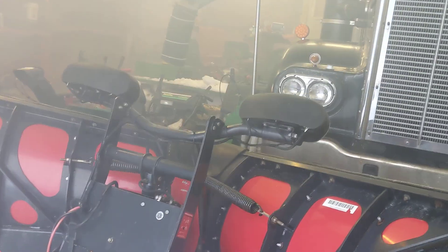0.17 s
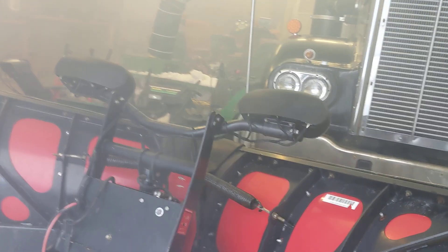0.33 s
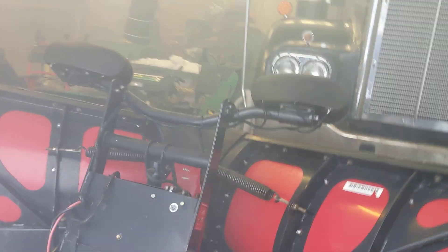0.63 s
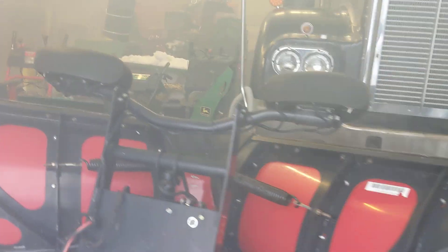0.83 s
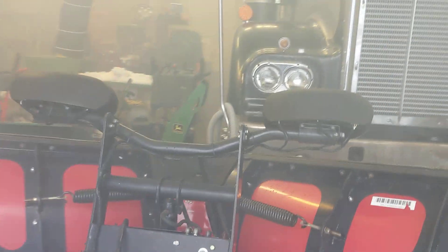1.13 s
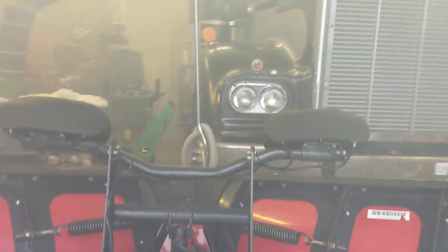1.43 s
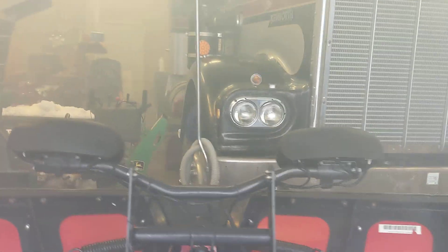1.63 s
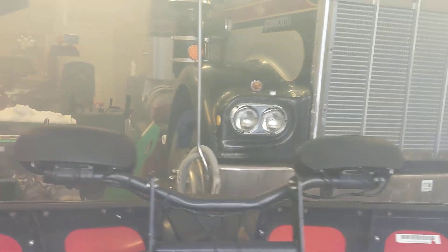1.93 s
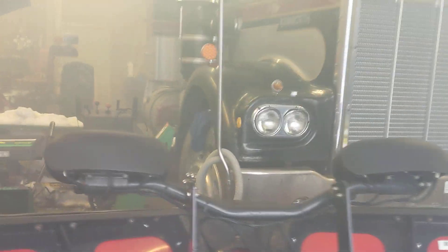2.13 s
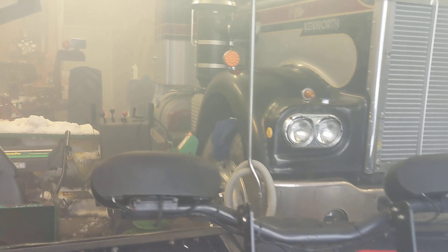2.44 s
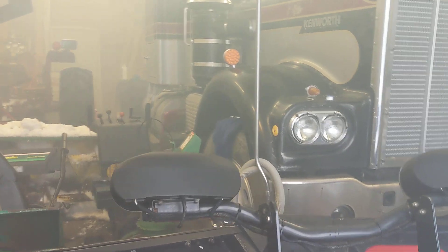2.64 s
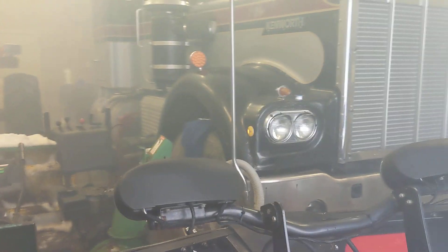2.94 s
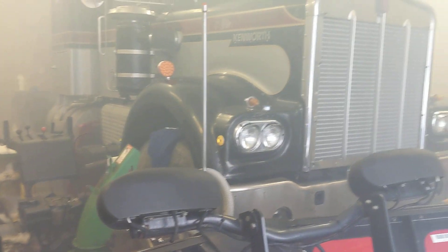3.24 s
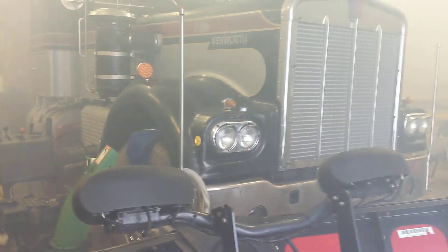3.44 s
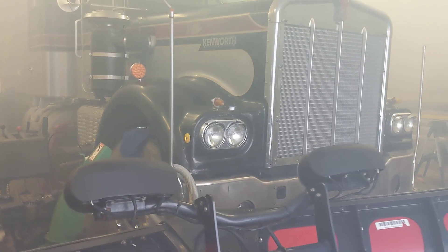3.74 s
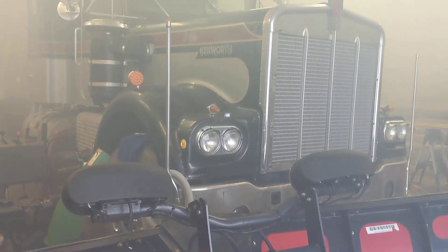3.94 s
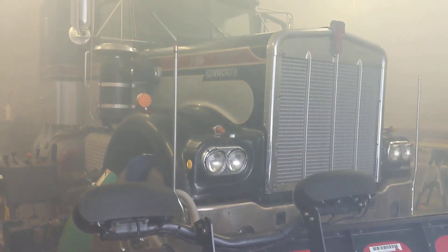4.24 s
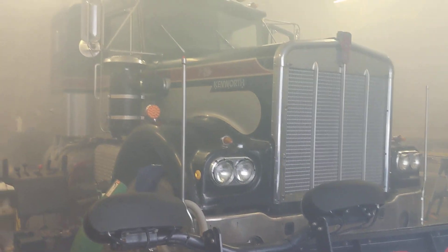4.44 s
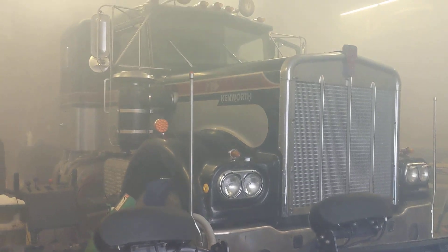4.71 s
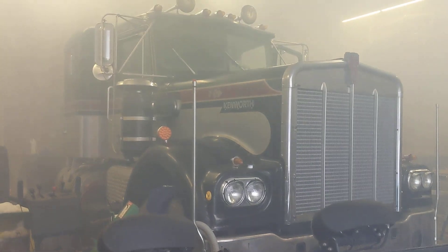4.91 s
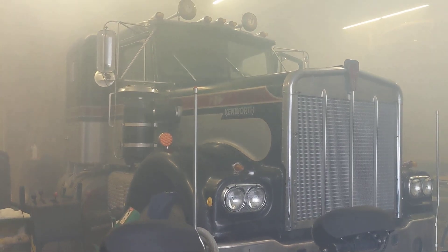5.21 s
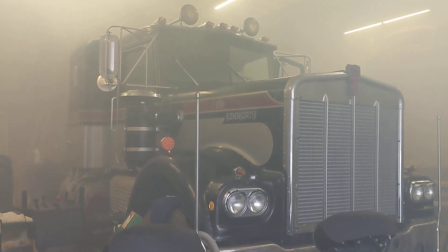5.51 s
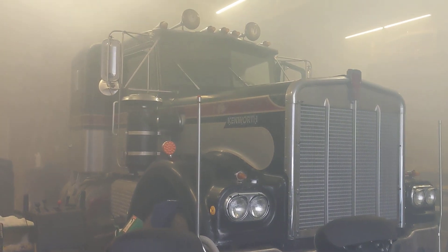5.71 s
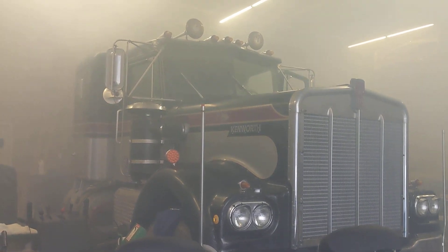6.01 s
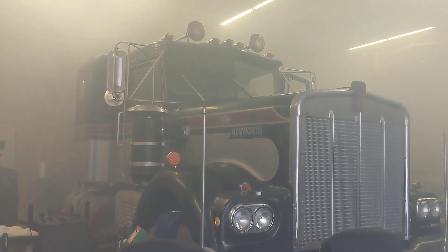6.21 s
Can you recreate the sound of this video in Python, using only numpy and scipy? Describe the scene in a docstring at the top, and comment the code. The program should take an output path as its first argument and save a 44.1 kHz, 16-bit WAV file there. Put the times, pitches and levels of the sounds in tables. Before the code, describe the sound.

A large two-stroke diesel truck engine idles continuously inside a closed workshop. A deep, rough exhaust drone dominates, its pitch slowly rising and sagging a little as the governor hunts. Over it lie mechanical clatter and a steady whirr and hiss of air. A handheld stereo microphone moves nearby, shifting the tone colour; around two seconds a few dry, high ticks sound very close, slightly to the left.

```python
"""Closed workshop, a large two-stroke diesel idling, its governor hunting slowly around 517 rpm.
The exhaust drones as tones on the crank orders, with noise for the turbulent gas between them.
The block clatters as noise in a pattern that nearly repeats each turn; bands of noise whirr and hiss as air.
The hand-held pair of microphones turns and moves; a few dry, high ticks, short bursts of noise, sound close to it."""
import sys
import numpy as np
from scipy import signal
from scipy.fft import rfft, irfft, next_fast_len
from scipy.io import wavfile
from scipy.ndimage import uniform_filter1d, minimum_filter1d, map_coordinates

SR = 44100
rng = np.random.default_rng(int(sys.argv[2]) if len(sys.argv) > 2 else 0)


def store_pcm(level_fs):
    """Save levels as 16-bit WAV."""
    pcm = np.round(np.clip(level_fs, -1, 1) * 32767).astype(np.int16)
    wavfile.write(sys.argv[1], SR, np.atleast_2d(pcm).T)


def natural_amplitude(level_db):
    """Convert a level in decibels to a linear amplitude factor, elementwise."""
    exponent = np.asarray(level_db, float) / 20
    return 10 ** exponent


N = 280454  # length (samples)


def unit(x):
    """Scaled to rms 1."""
    return x / np.sqrt(np.mean(x ** 2) + 1e-20)


def along(points, hz):
    """(Hz, value) points read on a log frequency axis."""
    f, v = np.transpose(points)
    return np.interp(np.log(hz + 1), np.log(f + 1), v)


def curves(rows):
    """One value per sample for each column after the time."""
    s, *cols = np.transpose(rows)
    return [np.interp(np.arange(N) / SR, s, c) for c in cols]


def wobble(rate, size=N):
    """A smooth random curve over the whole scene, rate knots a second."""
    knots = N * rate / SR
    return map_coordinates(rng.standard_normal(int(knots) + 4), [np.linspace(0, knots, size)])


def late(x, seconds):
    """x as it was some seconds before."""
    return np.interp(np.arange(N) - seconds * SR, np.arange(N), x)


def filtered(x, response):
    """x times a real or complex response of frequency."""
    m = next_fast_len(N + 8192)
    return irfft(rfft(x, m) * response(np.fft.rfftfreq(m, 1 / SR)), m)[..., :N]


def resonances_db(modes, hz):
    """Sum of bell-shaped peaks and dips in dB, from (centre Hz, width Hz, dB) rows."""
    return sum(db / (1 + (2 * (hz - centre) / width) ** 2) for centre, width, db in modes)


# how alike the two microphones hear the noise: f/Hz, likeness (-1 to 1)
ALIKE = [(60, 1.0), (130, 0.89), (290, 0.91), (640, 0.77), (1410, 0.43), (3100, -0.2), (6820, -0.056),
         (15000, -0.05)]
# lean of the noise to the left microphone: f/Hz, left over right level/dB
LEFT_DB = [(60, -4), (99, -11), (160, 2), (270, 0.5), (450, 3), (740, 1), (1220, 7.5), (2010, 4.5),
           (3330, -3), (5500, 6.5), (9080, 0.5), (15000, 4.5)]
# how far the left microphone lags: f/Hz, phase/rad
LAG = [(100, 0.062), (520, 1), (1300, 0), (2200, 0.33)]


def spread(pair, gain):
    """Two unrelated signals coloured and shared out over the two microphones."""
    turn = lambda hz: np.arccos(np.clip(along(ALIKE, hz), -1, 1)) / 2
    mid, side = filtered(pair, lambda hz: gain(hz) * [np.cos(turn(hz)), np.sin(turn(hz))])
    lean = lambda hz: natural_amplitude(along(LEFT_DB, hz) / 2) * np.exp(-.5j * along(LAG, hz))
    return filtered(np.array([mid + side, mid - side]), lambda hz: [lean(hz), 1 / lean(hz)])


def panned(x, db):
    """Louder on the left by db relative to the right."""
    return x * natural_amplitude([db / 2, -db / 2])


# crank speed as the governor hunts: t/s, speed/rpm
SPEED = [(0.0, 512.0), (0.24, 509.1), (0.73, 523.8), (1.0, 517.5), (1.5, 516.4), (1.96, 522.2),
         (2.3, 511.2), (2.7, 511.7), (3.15, 528.9), (3.7, 502.7), (3.9, 501.5), (4.45, 536.4),
         (4.65, 532.5), (5.14, 500.1), (5.4, 503.4), (5.75, 515.4), (6.11, 531.6), (6.36, 520.5)]
MEAN_RPM = 517.2


def crank():
    """Speed in rpm and crank angle in radians, the angle being the running sum of the speed."""
    rpm, = curves(SPEED)
    return rpm, np.cumsum(rpm) * 2 * np.pi / 60 / SR


def throb(angle, once_db, firing_db):
    """Gain that swells once a turn and four times a turn."""
    return natural_amplitude(once_db * np.cos(angle - 2.4) + firing_db * np.cos(4 * angle - 1.1))


CHUG_DB, CHUG_DB_PER_FUEL = 1.24, 0.5  # swell at share 1, and its growth per % of slowing
CHUG_ANGLE = 1  # crank angle of the swell (rad)


def chug(angle, fuel, share):
    """The cylinders pull unevenly, the more so with more fuel: a swell once a turn."""
    return natural_amplitude(share * (CHUG_DB + CHUG_DB_PER_FUEL * fuel) * np.cos(angle - CHUG_ANGLE))


# exhaust tones as the walls pass them on, one row for each crank order from the third up,
# before the standing waves and the stirring: level/dB
EXHAUST = [-50, -24, -37, -64, -36.5, -32, -36, -34.5, -30.5, -12.5, -34.5, -36, -39, -29.5, -30, -41, -57,
           -32, -30.5, -35, -42, -50.5, -33.5, -33, -40, -48.5, -42, -54, -36.5, -37, -35, -34.5, -37, -37,
           -46.5, -36, -46.5, -45, -39, -32.5, -45.5, -61, -48.5, -43.5]
# standing waves of the shop, which the tones slide through as the speed hunts: f/Hz, width/Hz, level/dB
STANDING = [(66.6, 3.6, 6.5), (99.9, 2.57, -10), (104.1, 1.8, 1.5), (106.6, 5.5, -1.5), (133.8, 4, 8.5),
            (174.8, 6.1, 7), (234.4, 4.4, 7.5)]
# change of the tones as the listener moves: f/Hz, slope/(dB per s)
MOVING = [(30, 0.4), (70, 0.74), (100, -0.27), (150, -0.5), (200, 0.94), (260, -0.9), (400, -1.5)]
# left-right difference of the tones against their common part: f/Hz, level/dB
SIDE_DB = [(60, -37), (180, -24.5), (550, 1), (1650, -3), (4970, 1), (15000, 0)]
# strength of the twelve blows of one turn, which sets only the phases of the tones: level/dB
BLOWS_DB = [-6.6, 1.7, 3.5, 4.1, .5, -1, -.8, -.6, -1.1, -1.7, 2.2, 4.6]
FIRST_BLOW = 3.2009  # crank angle (rad)
# the delay in the pipe grows with pitch up to order 22 and falls slightly above (rad per order squared)
SMEAR, UNSMEAR = .1101, .1324
SIDE_AHEAD = 1.9  # mean phase of the left-right difference ahead of the common tone (rad)
UPPER_DB_PER_FUEL = 0.87  # the tones above order 21 grow with the fuel
STEP = 16  # the tones are made at 1/16 of the sample rate


def exhaust(rpm, angle, fuel):
    """One tone per crank order; the uneven blows set how the tones line up. Made at a low rate, then raised."""
    swell = (chug(angle, fuel, 1.2) * natural_amplitude(UPPER_DB_PER_FUEL * fuel))[::STEP]
    rpm, angle = rpm[::STEP], angle[::STEP]
    since_middle = np.linspace(-.5, .5, len(rpm)) * N / SR
    blow_angle = FIRST_BLOW + np.arange(len(BLOWS_DB)) * 2 * np.pi / len(BLOWS_DB)
    slow = lambda rate: wobble(rate, size=len(rpm))
    mid, side = np.zeros((2, len(rpm)))
    for order, db in enumerate(EXHAUST, start=3):
        hz = order * MEAN_RPM / 60
        # the shorter the wave, the more the walls and the moving listener stir it
        loose = min((hz / 420) ** 1.5, 1)
        level = db + resonances_db(STANDING, order * rpm / 60) + along(MOVING, hz) * since_middle
        stir = 1 + loose * (slow(2.636) + 1j * slow(2.614))
        stir /= np.sqrt(1 + 2 * loose ** 2)
        phase = order * angle + np.angle(np.exp(-1j * order * blow_angle) @ natural_amplitude(BLOWS_DB))
        phase += loose ** 2 * slow(1.446)
        phase += UNSMEAR * max(order - 22, 0) ** 2 - SMEAR * order ** 2
        tone = np.sqrt(2) * natural_amplitude(level - loose) * stir * np.exp(1j * phase)
        if order > 21:
            tone *= swell
        mid += tone.real
        side_turn = np.exp(1j * (SIDE_AHEAD + 3 * loose * slow(1.25)))
        side += natural_amplitude(along(SIDE_DB, hz)) * (tone * side_turn).real
    return signal.resample_poly([mid + side, mid - side], STEP, 1, axis=1)[:, :N]


# turbulent gas before its throb: f/Hz, level/(dB per Hz)
ROAR = [(20, -120), (28, -60), (50, -73), (95, -51), (150, -59), (260, -49), (420, -58), (600, -120)]


def roar(angle):
    """Turbulent gas fills the gaps between the exhaust tones."""
    per_hz = np.sqrt(SR / 2)  # brings white noise of rms 1 to 0 dB per Hz
    gas = spread(rng.standard_normal((2, N)), lambda hz: per_hz * natural_amplitude(along(ROAR, hz)))
    return gas * throb(angle, 0.31, 1.0)


def remembered(angle, memory, size, channels):
    """Noise with size values a turn, read at the crank angle; each turn keeps part of the one before."""
    turns = int(angle[-1] / (2 * np.pi)) + 12
    fresh = rng.standard_normal((channels, turns, size))
    pattern = signal.lfilter([np.sqrt(1 - memory ** 2)], [1, -memory], fresh, axis=1)
    pattern = pattern[:, 10:]  # the first turns only build up the memory
    where = angle / (2 * np.pi) * size
    return np.array([np.interp(where, np.arange(row.size), row.ravel()) for row in pattern])


# colour of the clatter, relative: f/Hz, level/dB
CLATTER = [(250, -8.5), (420, -4), (465, -9), (496, -2.5), (540, -3), (684, 1.5), (734, -1.5), (879, 1.5),
           (1170, -5), (1570, -5), (1950, -16), (2540, -65), (4290, -120)]
# power share of the clatter that repeats from turn to turn, before its make-up gain: f/Hz, share (0-1)
REPEATS = [(450, 0.74), (700, 0.2), (1000, 0.47), (1500, 0.35), (2000, 0.28)]


def clatter(angle):
    """Injectors, valves and gears: a pattern tied to the crank that is slowly forgotten, plus fresh noise."""
    share = lambda hz: np.clip(along(REPEATS, hz), 0, 1)
    pattern = remembered(angle, 0.86, size=5120, channels=2)
    mix = filtered(pattern, lambda hz: np.sqrt(1.54 * share(hz)))  # 1.54: make-up gain in power
    mix += filtered(rng.standard_normal((2, N)), lambda hz: np.sqrt(1 - share(hz)))
    # some strokes come harder, turn after turn
    strokes = natural_amplitude(0.43 * remembered(angle, 0.98, size=24, channels=1))
    block = unit(spread(mix, lambda hz: natural_amplitude(along(CLATTER, hz))) * strokes)
    return block * throb(angle, 0.27, 0.49)


# narrow peaks and dips of the shop, heard from where the listener stands first: f/Hz, width/Hz, level/dB
FIRST_PLACE = [(428, 62, 6.5), (456, 9.4, 7), (586, 21, 5), (606, 13.4, -20), (635, 8.1, 9), (650, 18, -10),
               (664, 10.5, -1), (897, 7.3, 6)]
# the same from where the listener stands afterwards: f/Hz, width/Hz, level/dB
SECOND_PLACE = [(439.3, 22, 11.5), (487, 16, 0), (466, 10, -3), (507, 13, 10.5), (705, 6.3, 10),
                (716, 7.6, -13), (840, 19, 5), (970, 28, 2.5), (1013, 16, 1)]


def placed(x):
    """The shop's narrow peaks and dips change as the listener moves from the first place to the second."""
    ripple = lambda modes: lambda hz: natural_amplitude(resonances_db(modes, hz))
    moved = np.clip((np.arange(N) / SR - 2.6) / 1.04, 0, 1)  # sets off at 2.6 s, takes 1.04 s
    return (1 - moved) * filtered(x, ripple(FIRST_PLACE)) + moved * filtered(x, ripple(SECOND_PLACE))


# close ticks, level before the sizzle and the lean to the left: t/s, level/dB, centre f/Hz
TICKS = [(1.9896, -31, 12000), (2.0475, -40, 11700), (2.2465, -34.5, 11200), (2.2889, -35.5, 15000),
         (2.3134, -33.5, 14900), (2.3543, -26, 15000), (2.3842, -30.5, 15000), (2.428, -32.5, 13900),
         (2.503, -28, 15100), (2.6641, -43.5, 11500)]


def ticks(width_hz=1500, t60=.045, sizzle_db=-11, sizzle_t60=0.52):
    """Bursts of bright noise, 0.2 s each, that start at once and die fast, leaving a weaker sizzle."""
    out, t = np.zeros((2, N + SR)), np.arange(SR // 5) / SR
    f = np.fft.rfftfreq(len(t), 1 / SR)
    fade = natural_amplitude(-60 * t / t60) + natural_amplitude(sizzle_db - 60 * t / sizzle_t60)
    for s, db, hz in TICKS:
        band = 1 / (1 + ((f - hz) / width_hz) ** 2) + 0.22 * (f > 8500)
        burst = unit(irfft(rfft(rng.standard_normal((2, len(t)))) * band, len(t)))
        out[:, round(s * SR):][:, :len(t)] += natural_amplitude(db) * fade * burst
    return out[:, :N] * natural_amplitude([[2.6], [-2.6]])


# colour of the upper air, relative: f/Hz, level/dB
WHIRR = [(1650, -18), (2800, -5), (3260, 3), (3640, -2.5), (4150, 0.5), (4800, -5), (6240, -39),
         (10600, -120)]
# colour of the lower air, relative: f/Hz, level/dB
LOW_WHIRR = [(1150, -18), (1950, -10), (2800, -13), (3640, -30.5), (6160, -120)]


def whirr(angle, spectrum):
    """Fan and blower air as coloured noise, throbbing faintly with the crank and wavering."""
    air = spread(rng.standard_normal((2, N)), lambda hz: natural_amplitude(along(spectrum, hz)))
    return unit(air) * throb(angle, 0.11, 0.17) * natural_amplitude(0.3 * wobble(7.8))


# colour of the hiss under its resonances, relative: f/Hz, level/dB
HISS = [(2820, -46), (4800, -6.5), (5660, -0.5), (6480, -9), (14300, -11.5), (15900, -27)]
# resonances of the hiss: f/Hz, width/Hz, level/dB
HISS_PEAKS = [(5650, 1060, 6.5), (7580, 1100, 6), (9620, 930, 6), (11700, 220, 6.5), (15000, 500, 11.5)]


def hiss(angle):
    """Intake air, noise coloured by a row of resonances."""
    colour = lambda hz: natural_amplitude(along(HISS, hz) + resonances_db(HISS_PEAKS, hz))
    air = spread(rng.standard_normal((2, N)), colour)
    return unit(air) * throb(angle, 0.31, 0.32) * natural_amplitude(0.26 * wobble(7))


# how far the listener has turned: t/s, share (0-1)
TURN = [(0, 0), (.25, 0.33), (3.2, 0.28), (3.9, .5), (4.7, 0.56), (5.1, 0.96), (5.6, 1), (6, 0.77),
        (6.36, 0.9)]
# lean to the left, each column used about its mean: t/s, 280-750 Hz range level/dB, whirr level/dB
PAN = [(0, -4, 3), (1, -3, 0), (2.2, -0.5, -1.5), (3.2, 0.5, -1.5), (3.9, -0.5, -1.5), (4.7, 1.5, -2.5),
       (5.1, -2, -3.5), (6.36, 0.5, -6.5)]
# the governor adds fuel when the crank has slowed: the exhaust beat answers first, clatter and air later
GOVERNOR_LAG_S, NOISE_LAG_S = .06, 0.29
BUILD_UP_S = .04  # a standing wave follows the speed this late
# (dB at mean speed, dB for each % under the mean speed, dB gained once the listener has turned)
CLATTER_LEVEL, WHIRR_LEVEL = (-21.5, 0.17, 2.86), (-34.5, 0.38, 1.4)
LOW_WHIRR_LEVEL, HISS_LEVEL = (-37, 0.17, 8.2), (-34, 0.52, 1.8)


def scene():
    """Engine and ticks at the two microphones; clatter and air grow when the crank has slowed."""
    rpm, angle = crank()
    slowed = 100 * (1 - rpm / MEAN_RPM)  # % under the mean speed
    fuel, air_flow = late(slowed, GOVERNOR_LAG_S), late(slowed, NOISE_LAG_S)
    turn, = curves(TURN)
    low_pan_db, whirr_pan_db = curves(PAN)

    def level(db, db_per_fuel, turned_db):
        """Gain that follows the fuel and the turning listener, with a slow random waver."""
        return natural_amplitude(db + db_per_fuel * air_flow + turned_db * turn + 0.9 * wobble(2.495))

    uneven = chug(angle, fuel, 0.44)
    block = placed(level(*CLATTER_LEVEL) * clatter(angle) * uneven)
    low = exhaust(late(rpm, BUILD_UP_S), angle, fuel) + roar(angle) * uneven + block
    turned = filtered(low, lambda hz: (hz > 280) & (hz < 750))  # this range swings as the listener turns
    low += panned(turned, low_pan_db - low_pan_db.mean()) - turned
    air = level(*WHIRR_LEVEL) * whirr(angle, WHIRR)
    air += level(*LOW_WHIRR_LEVEL) * whirr(angle, LOW_WHIRR)
    air = panned(air, whirr_pan_db - whirr_pan_db.mean())
    return low + air + level(*HISS_LEVEL) * hiss(angle) + ticks()


def low_pass(x):
    """Removes everything above the highest recorded frequency."""
    return signal.sosfilt(signal.butter(12, 16240, fs=SR, output="sos"), x)


def record(dry, ceiling=0.69, size=601):
    """A peak limiter common to both channels, then the band limit of the microphone chain's output."""
    needed = np.minimum(1, ceiling / (np.abs(dry).max(axis=0) + 1e-9))
    gain = uniform_filter1d(minimum_filter1d(needed, size), size)
    mix = filtered(dry * gain, lambda hz: hz < 15850)
    return low_pass(mix)


dry = scene()
out = record(dry)
store_pcm(out)
```